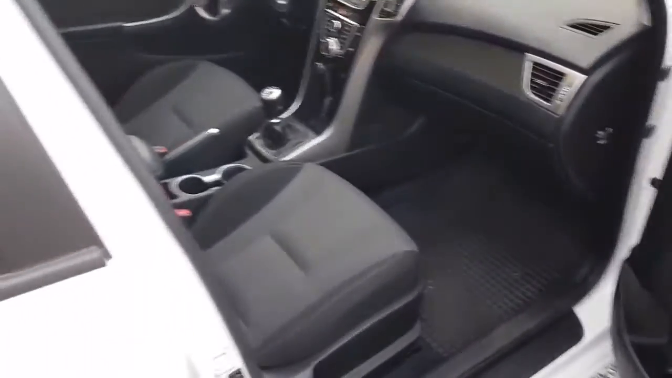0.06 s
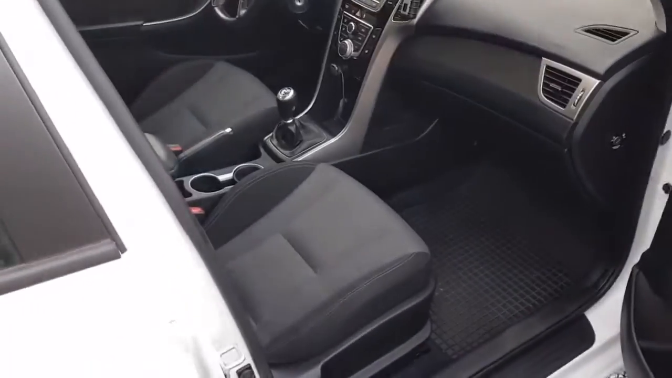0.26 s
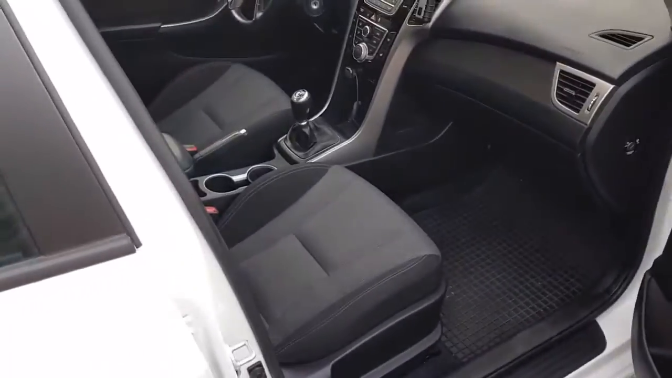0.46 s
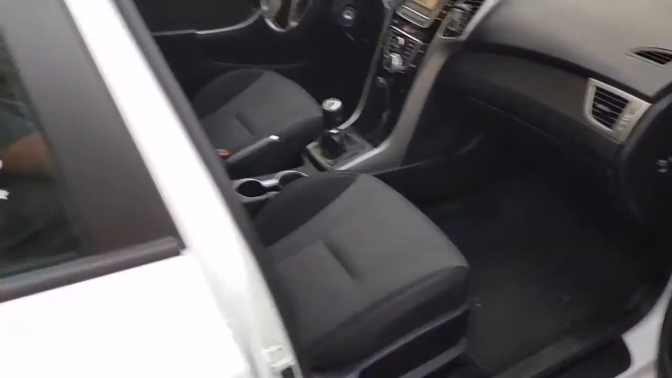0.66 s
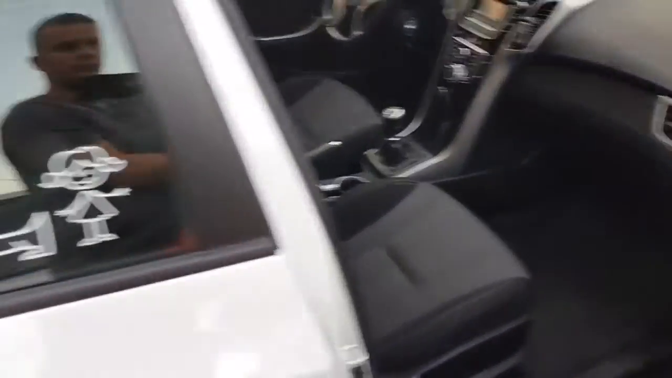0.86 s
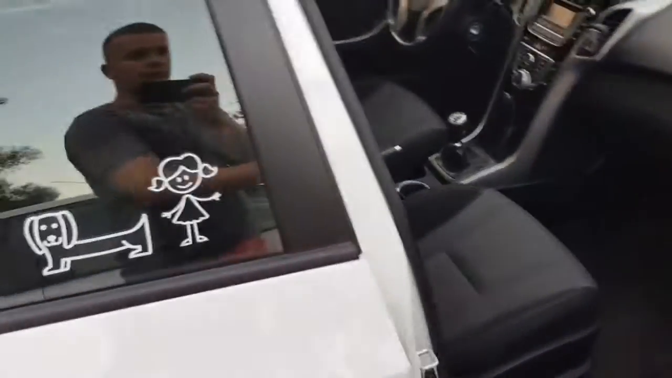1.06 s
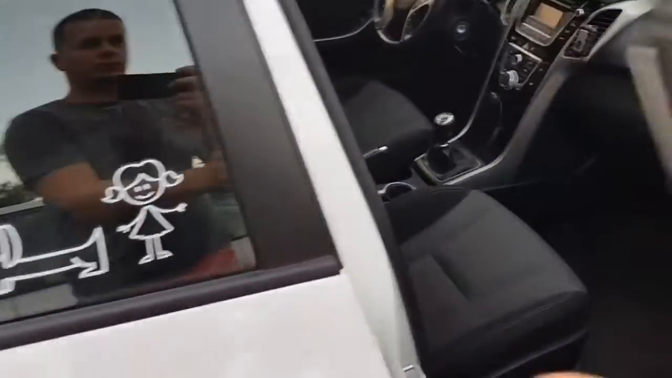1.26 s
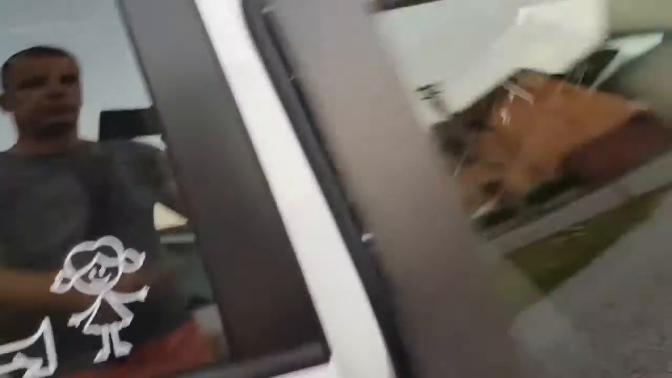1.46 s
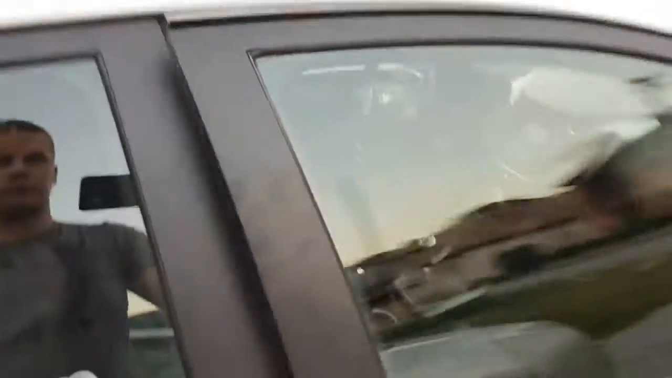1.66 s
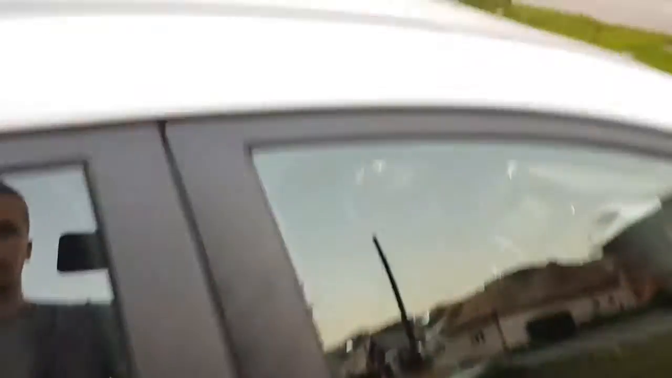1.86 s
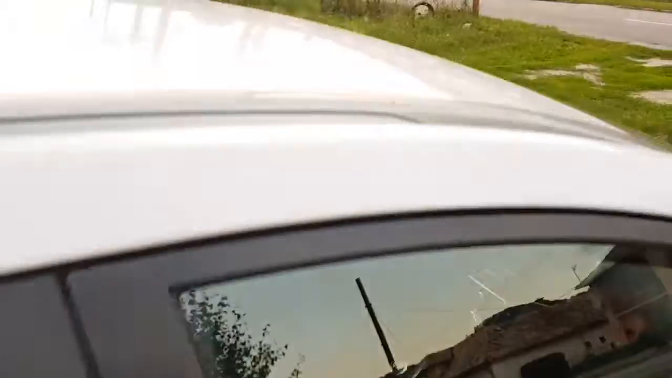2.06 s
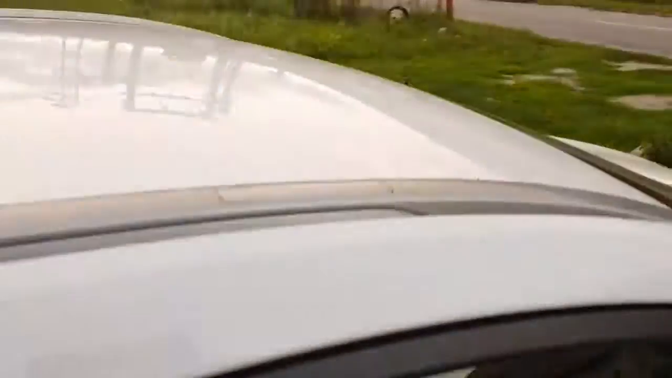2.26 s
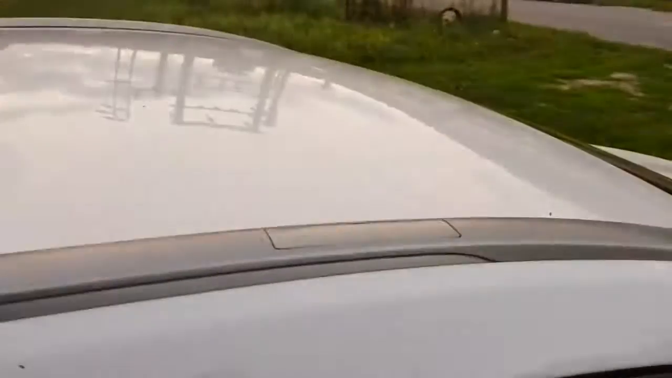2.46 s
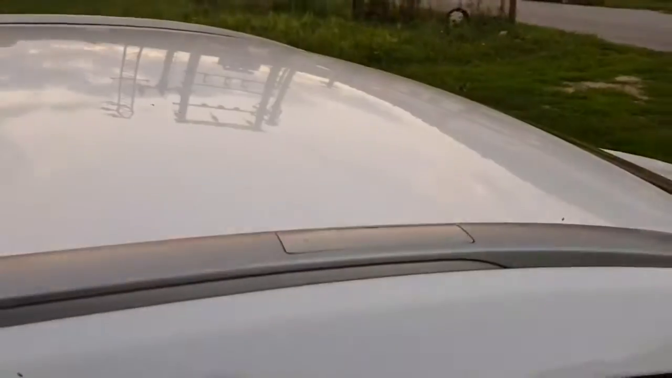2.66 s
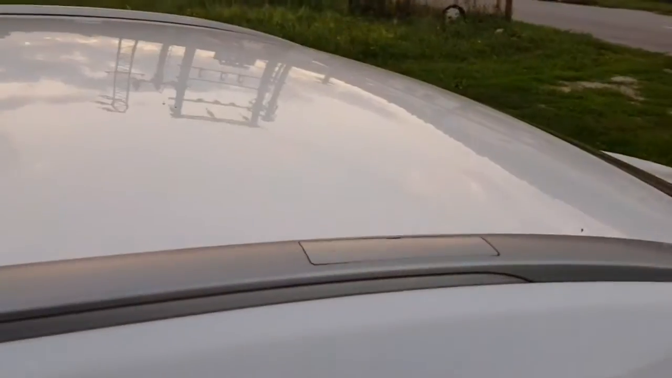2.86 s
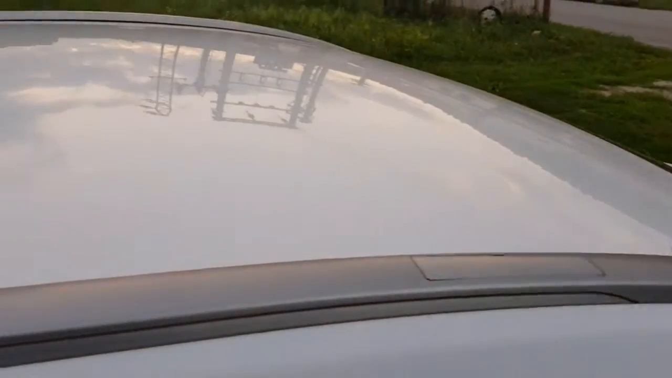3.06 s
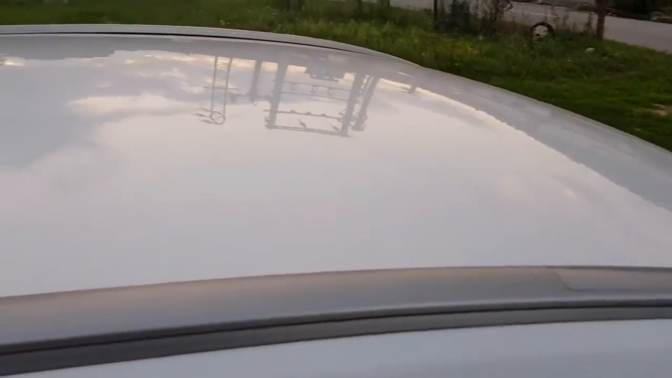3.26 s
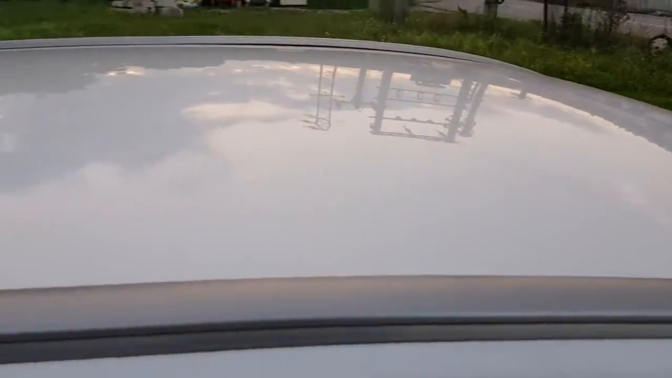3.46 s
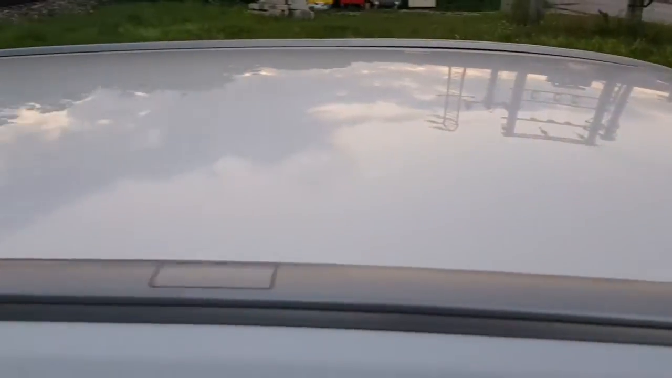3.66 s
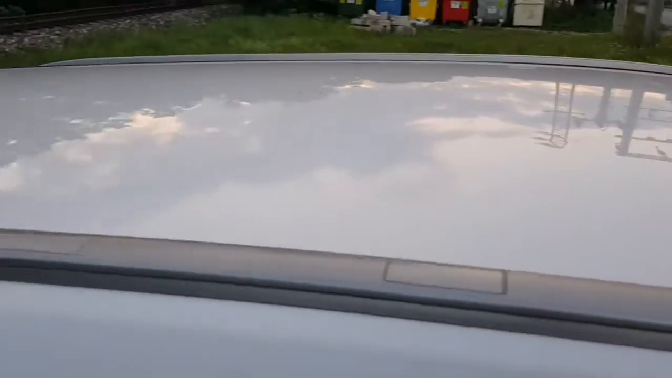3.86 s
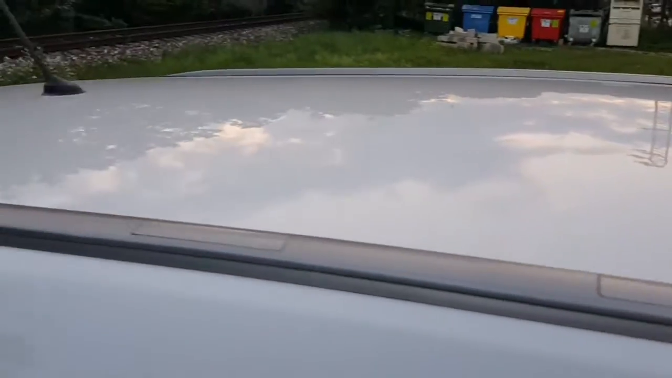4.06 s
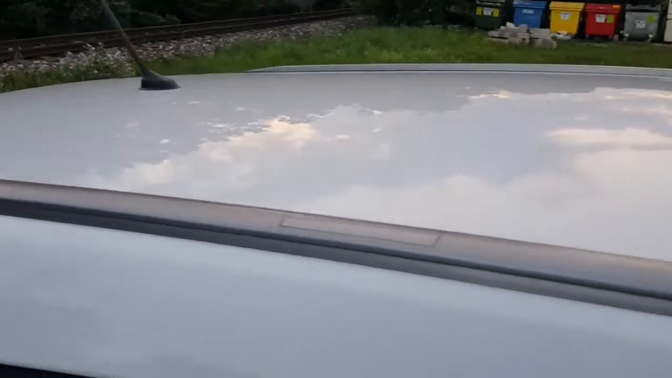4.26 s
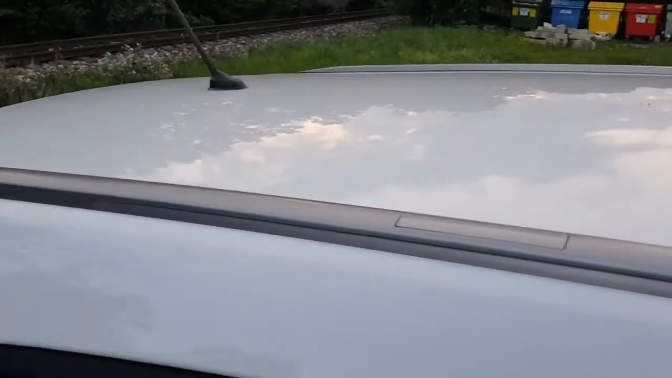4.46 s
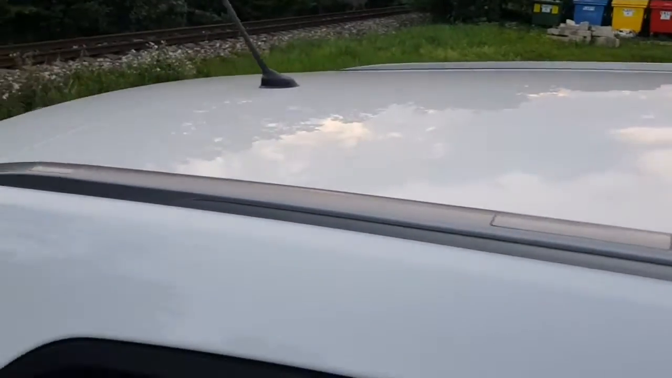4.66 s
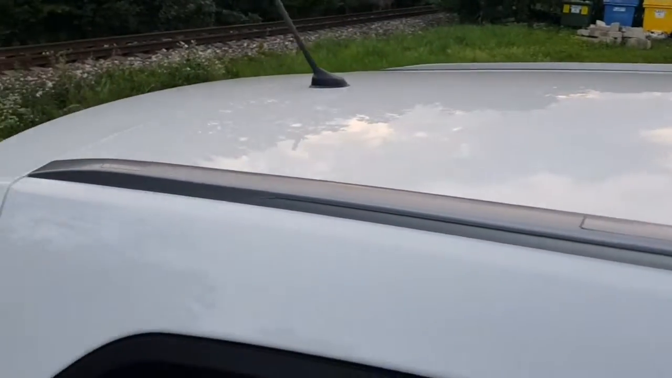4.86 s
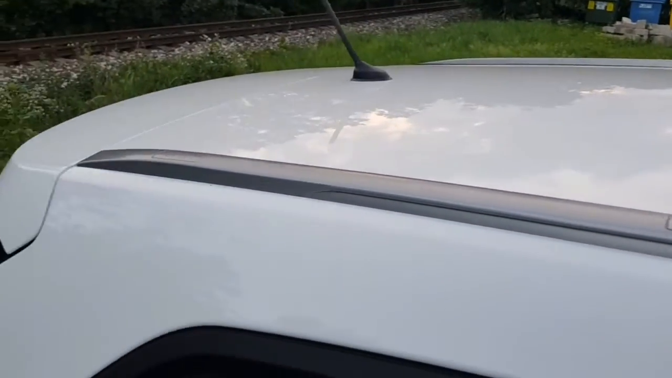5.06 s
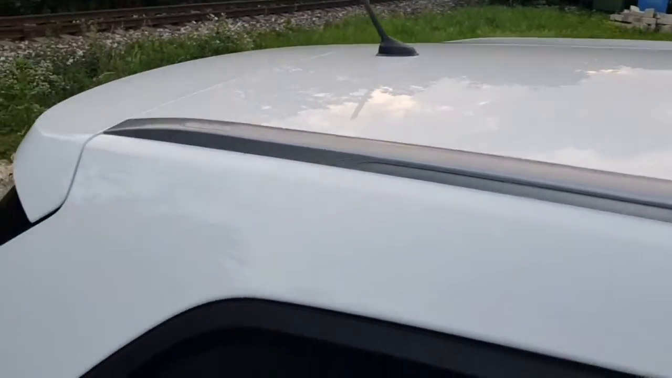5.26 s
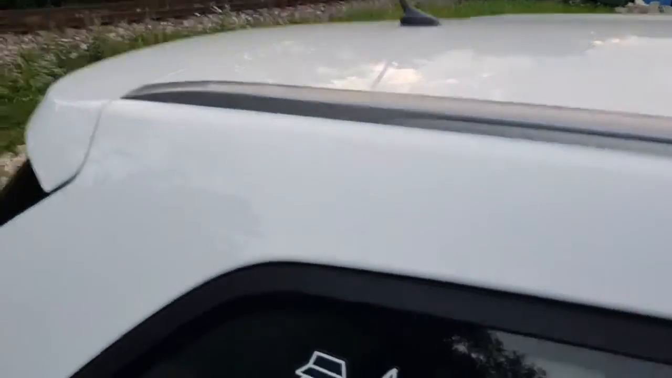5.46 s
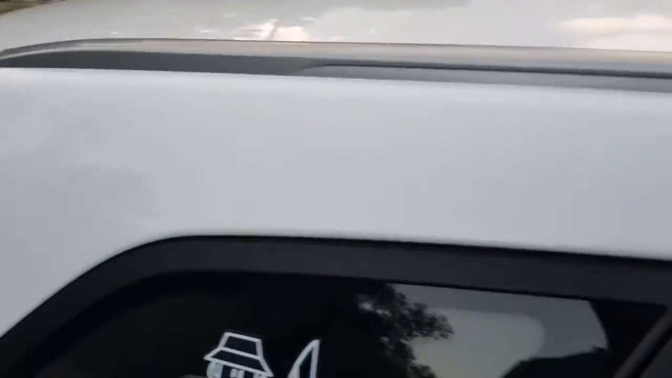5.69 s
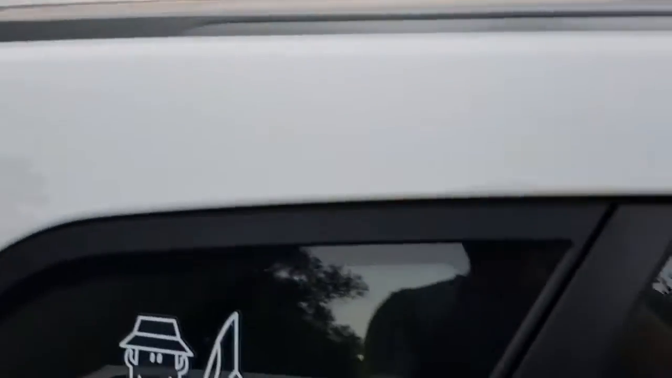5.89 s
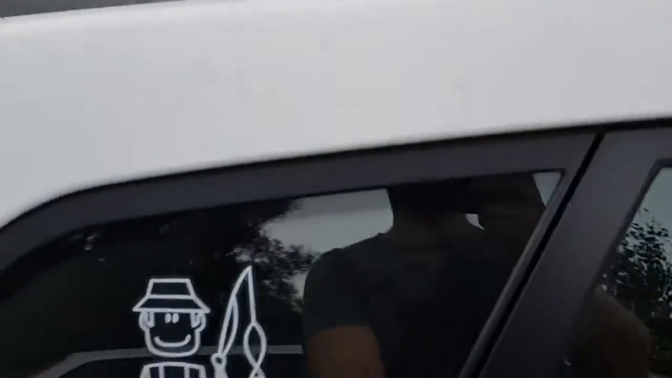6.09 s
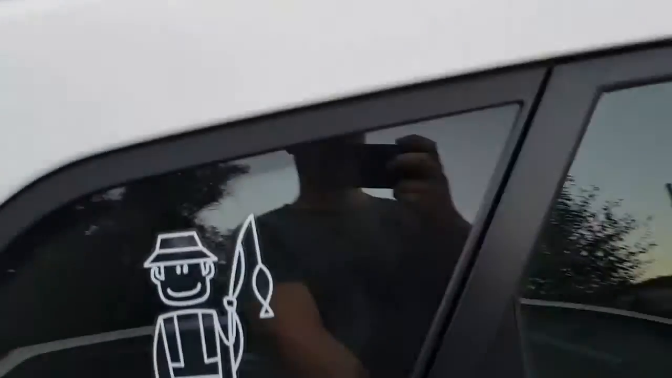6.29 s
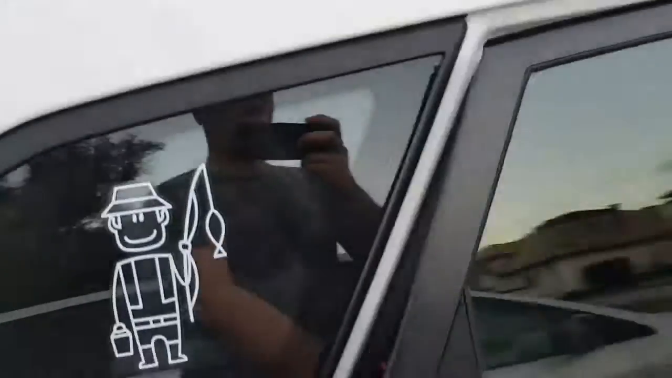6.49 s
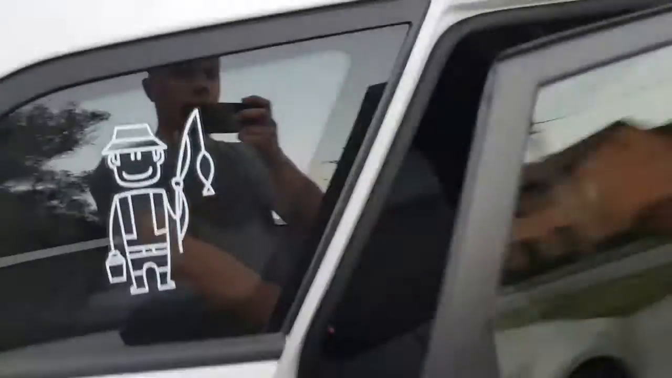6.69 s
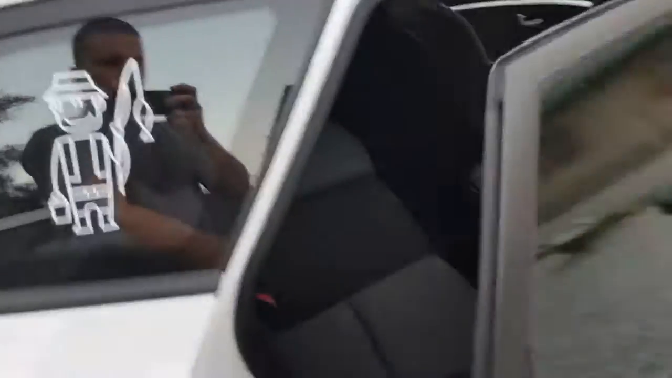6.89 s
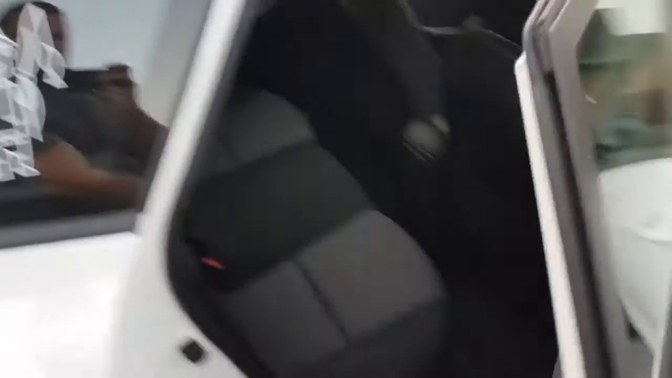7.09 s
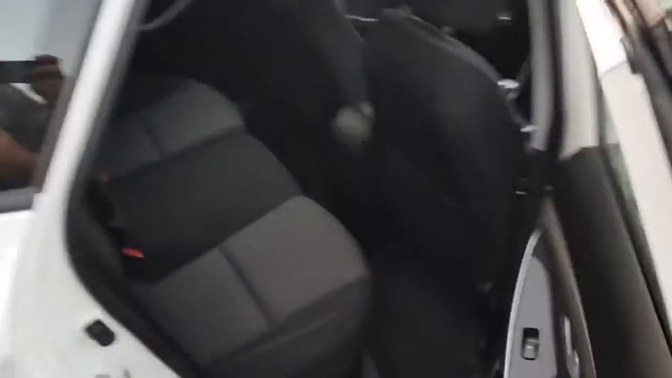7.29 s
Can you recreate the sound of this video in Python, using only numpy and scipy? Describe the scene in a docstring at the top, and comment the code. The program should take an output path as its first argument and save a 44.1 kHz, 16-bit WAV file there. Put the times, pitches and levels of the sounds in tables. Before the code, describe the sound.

Open air beside a parked car, heard through a hand-held stereo phone: steady faint traffic slightly to the left, thin hiss, light wind and a soft tyre hum that swells around 1.3 s and 5.7 s. A brief wind puff starts it; small bird pips and a weak whistle come before 0.6 s. Small clicks at 1.57 and 1.68 s, a short rush of air, then at 1.8 s a loud, close front-door slam: latch cracks, deep thump, quick rebounds and trim rattle. The background is ducked for about a second, with cloth rustle at 2 s and a scuff near 2.9 s. A click at 4.05 s, rising bird whistles at 4.45 and 5.7 s, rustling and scuffing around 5.4 s. Handle knocks and clicks from 6.05 s; at 6.36 s the rear door pops off its seal with a duller, softer thump, then slowing ticks and faint knocks around 7.2 s.

```python
"""Two car doors in the open air

Beside a parked car the front door is slammed, then the rear handle is pulled and that door pops off its seal.
Each blow sets off decaying modes of latch, door skin and cabin air, and noise grains from the shaken trim;
small parts tick as the door swings out. Shaped noise gives far traffic, a high hiss, light wind and rustling
clothes; gliding tones give a small bird's rising whistles and falling pips. All reach the two ports of a
hand-held phone, whose gain drops for about a second after the slam."""
import sys
import numpy as np
from scipy import signal
from scipy.fft import rfft, irfft
from scipy.io import wavfile
from scipy.ndimage import uniform_filter1d, minimum_filter1d

SR = 44100
rng = np.random.default_rng(int(sys.argv[2]) if len(sys.argv) > 2 else 0)


def put_to_file(sound):
    """Save the sound as 16-bit audio at rate SR, in the file named by the first command-line argument."""
    columns = np.atleast_2d(sound).T  # one column per channel
    safe = np.clip(columns, -1, 1)
    whole_steps = np.round(safe * 32767)
    wavfile.write(sys.argv[1], SR, whole_steps.astype(np.int16))


N = 323552
T = np.arange(N) / SR
SHUT_S = 1.788  # the front door meets its seal
ROAD_LAG_S = .0004  # the road's sound reaches the right port this much later


def undb(db):
    """Logarithmic level: decibels to amplitude gain."""
    return 10 ** (np.asarray(db) / 20)


def unit(x):
    """Normalisation: scale to rms 1."""
    return x / np.sqrt(np.mean(x ** 2))


def curve(table):
    """Linear interpolation: a timed table joined by straight lines."""
    s, value = np.transpose(table)
    return np.interp(T, s, value)


def pan(db):
    """Interchannel level difference: left and right gains, left minus right in dB."""
    return undb(np.array([[db], [-db]]) / 2)


def add(out, s, x):
    """Superposition: mix x into out from time s."""
    i = max(int(s * SR), 0)
    out[:, i:i + x.shape[-1]] += x[..., :N - i]


def swells(table):
    """Superposition of Gaussian envelopes, one per row, down to 1/e at the half length."""
    return sum(undb(db) * np.exp(-((T - s) / half_s) ** 2) for s, db, half_s in table)


def walk(rate):
    """Low-pass random process: smoothed steps, about rate per second, with a spread of 1."""
    k = int(SR / rate)
    steps = np.repeat(rng.standard_normal(N // k + 1), k)
    return unit(uniform_filter1d(uniform_filter1d(steps, k), k)[:N])


def colour(spectrum, f):
    """Spectral shaping: gain of a (f/Hz, level/dB) table, interpolated over log frequency."""
    hz, db = np.transpose(spectrum)
    return undb(np.interp(np.log(f + 1), np.log(hz), db))


def noise(spectrum, size, wide_hz=2000, peak_hz=1000, peak=0, lag_s=0):
    """Interaural coherence: coloured noise, alike at both ports in the bass and unlike in the treble."""
    f = np.fft.rfftfreq(size, 1 / SR)
    resonance = 1 + peak / (1 + ((f / peak_hz - 1) / 0.1) ** 2)
    mid, side = rfft(rng.standard_normal((2, size)))
    side = side * f / np.hypot(f, wide_hz)
    lag = np.exp(-2j * np.pi * f * lag_s)
    ports = np.array([mid + side, (mid - side) * lag])
    return unit(irfft(colour(spectrum, f) * resonance * ports, size))


def burst(rise_s, t60):
    """Free decay: half a second of envelope, a smooth rise and then 60 dB of fall per t60 (s)."""
    t = T[:SR // 2]
    return (1 - np.exp(-(t / rise_s) ** 2)) * undb(-60 * np.maximum(t - rise_s, 0) / t60)


def ring(modes, contact_s, scatter=0, spread=0.088):
    """Modal synthesis: one push sets off decaying sines; a softer contact starts them more gently."""
    out = 0
    for (hz, db, t60), (detune, offset) in zip(modes, rng.standard_normal((len(modes), 2))):
        phase = 2 * np.pi * hz * (1 + scatter * detune) * T[:SR // 2]
        # a wide panel reaches the two ports slightly out of step
        skew = spread * np.sqrt(hz / 200) * offset * np.array([[1], [-1]])
        out = out + undb(db) * np.sin(phase + skew) * burst(contact_s, t60)
    return out


# spectrum of the far traffic (f/Hz, level/dB per Hz)
TRAFFIC_SPECTRUM = [(25, -34), (55, -21), (100, -10.5), (155, -2.5), (210, -7), (350, 0), (430, -3),
                    (505, 0), (630, -5), (900, 0.5), (1400, -7), (2100, -16), (3000, -20.5), (8000, -31.5),
                    (16000, -37)]


def traffic(level_db=-47, flicker_db=.8):
    """Arrival-time difference: far traffic off to the left reaches the left port first."""
    level = undb(level_db + flicker_db * walk(8))
    return noise(TRAFFIC_SPECTRUM, N, wide_hz=1390, lag_s=ROAD_LAG_S) * level * pan(0.54)


# spectrum of the high hiss (f/Hz, level/dB per Hz)
HISS_SPECTRUM = [(1000, 8), (3000, -12), (5000, -3.5), (6400, -11.5), (7600, 1.5), (8300, -2.5),
                 (9100, 0.5), (10500, -9), (13000, -19.5), (16000, -36)]
# level of the high hiss (t/s, level/dB)
HISS_COURSE = [(0, -61), (1.1, -57.5), (2.6, -57), (3.6, -54), (5, -53.5), (6.5, -58), (7, -69),
               (7.34, -78)]


def hiss():
    """Broadband noise: a smooth high hiss with a slowly changing level."""
    return noise(HISS_SPECTRUM, N) * undb(curve(HISS_COURSE)) * pan(.8)


# spectrum of the far vehicle (f/Hz, level/dB per Hz)
PASSING_SPECTRUM = [(600, -15), (1400, -1.5), (2100, 0), (3000, -8.5), (6000, -48), (12000, -45)]


def passing(s=4.8, half_s=1.53, db=-56.5):
    """Gaussian envelope: the road noise brightens for a moment as a far vehicle goes by."""
    return noise(PASSING_SPECTRUM, N) * undb(db) * np.exp(-((T - s) / half_s) ** 2)


# pitch of the narrow drifting band (t/s, f/Hz)
BAND_PITCH = [(0, 700), (.6, 798.5), (1.15, 1044), (1.8, 917.3), (4.5, 844.7), (7.34, 855.4)]
# the narrow band swells louder for a while (t/s, level/dB, half length/s)
BAND_SWELLS = [(1.35, -54.5, 0.59), (5.75, -52, 0.65)]


def drifting_band(steady_db=-57, width_hz=90):
    """Heterodyning: slow noise shifted to a drifting pitch is a narrow band that glides near 1 kHz and swells
    twice."""
    gain = undb(steady_db) + swells(BAND_SWELLS)
    low_pass = signal.butter(2, width_hz, fs=SR, output="sos")
    slow = signal.sosfilt(low_pass, rng.standard_normal((2, N)))
    carrier = np.exp(2j * np.pi * np.cumsum(curve(BAND_PITCH)) / SR)
    song = unit(np.real((slow[0] + 1j * slow[1]) * carrier)) * gain
    return np.array([song, np.roll(song, int(ROAD_LAG_S * SR))]) * pan(3.3)


# spectrum of wind on the ports (f/Hz, level/dB per Hz)
WIND_SPECTRUM = [(15, -12.5), (35, -3.5), (65, 4), (110, -3), (190, -14.5), (500, -48.5)]
# a thump of handling at the start, then gusts on the ports (t/s, level/dB, half length/s)
THUMP_AND_GUSTS = [(0, -31.5, 0.053), (.2, -56.5, 0.12), (.96, -51, 0.031), (3.87, -50.5, 0.11),
                   (4.2, -48, 0.054)]


def wind(breeze_db=-60.5, draught_db=-38, rise_s=0.029, fall_s=0.15, buffet_db=2):
    """Turbulent flow noise: low buffeting by breeze, gusts, a handling thump at the start and the draught of
    the slammed door."""
    draught = undb(draught_db) * np.exp(-np.maximum((SHUT_S - T) / rise_s, (T - SHUT_S) / fall_s))
    flow = undb(breeze_db) + swells(THUMP_AND_GUSTS) + draught
    return noise(WIND_SPECTRUM, N, wide_hz=251) * flow * undb(buffet_db * walk(25)) * pan(0.89)


# the bird's rising whistles, all over the same range (t/s, length/s, level/dB)
BIRD_WHISTLES = [(.48, .085, -66), (4.452, .105, -56), (5.706, .112, -51.5)]
# its short, slightly falling pips (t/s, f/Hz, level/dB)
BIRD_PIPS = [(.13, 5300, -58.5), (.455, 2980, -56), (5.125, 5030, -59)]
WHISTLE_FROM_HZ, WHISTLE_TO_HZ = 2850, 4670
PIP_S, PIP_FALL = 0.033, 0.049  # length, and fall as a fraction of the pitch
NOTE_GROWTH_DB = 4.5  # a note grows louder towards its end


def bird(echo_db=-7, echo_t60=0.34):
    """Frequency modulation and scattering: wavering glides that level off, echoed by trees and houses."""
    out = np.zeros((2, N))
    unsteady, flutter_db = 1 + .007 * walk(220), 2.5 * walk(150)
    notes = [(s, length_s, WHISTLE_FROM_HZ, WHISTLE_TO_HZ, db) for s, length_s, db in BIRD_WHISTLES]
    notes += [(s, PIP_S, hz, hz * (1 - PIP_FALL), db) for s, hz, db in BIRD_PIPS]
    for s, length_s, start_hz, end_hz, db in notes:
        u = np.linspace(0, 1, int(length_s * SR))
        own = slice(int(s * SR), int(s * SR) + len(u))
        glide = np.sin(np.pi / 2 * u ** 1.3)
        hz = (start_hz + (end_hz - start_hz) * glide) * unsteady[own]
        level = undb(db + NOTE_GROWTH_DB * (u - .5) + flutter_db[own])
        gain = np.sqrt(np.abs(np.sin(np.pi * u))) * level
        add(out, s, gain * np.sin(2 * np.pi * np.cumsum(hz) / SR))
    echo = rng.standard_normal((2, SR // 2)) * burst(0.0036, echo_t60)
    echo = echo / np.linalg.norm(echo[0])
    return out + undb(echo_db) * signal.fftconvolve(out, echo, axes=1)[:, :N]


# spectrum of rubbing cloth (f/Hz, level/dB per Hz)
CLOTH_SPECTRUM = [(300, -2), (2000, 5), (5500, 2), (9000, 3), (12500, 5.5), (16000, 0.5)]
# brushing of clothes and hand (t/s, level/dB, half length/s)
CLOTH_SWELLS = [(.143, -58, .05), (.9, -66.5, 0.85), (.99, -59.5, 0.058), (1.987, -49, 0.1),
                (2.7, -65.5, 0.37), (5.036, -55.5, .1), (5.445, -48, 0.036), (5.7, -63, 0.14),
                (6.45, -53.5, 0.14), (7.288, -59, 0.074)]
# spectrum of a scuff (f/Hz, level/dB per Hz)
SCUFF_SPECTRUM = [(100, -18), (220, -2.5), (380, 3), (550, -4), (900, -6), (2000, -18), (4500, -20.5),
                  (12000, -53)]
# dull scuffs of feet and sleeves (t/s, level/dB, half length/s)
SCUFF_SWELLS = [(.13, -52, .08), (2.91, -45.5, .02), (5.44, -46, 0.047), (5.63, -48.5, 0.11),
                (6.58, -52, 0.22), (7.26, -46, 0.049)]


def clothes(flutter_db=3.5):
    """Friction noise: bright swells of cloth and dull scuffs of feet and sleeves, with a fine flutter."""
    flutter = undb(flutter_db * walk(160))
    rustles = noise(CLOTH_SPECTRUM, N) * swells(CLOTH_SWELLS) * pan(-.5)
    scuffs = noise(SCUFF_SPECTRUM, N) * swells(SCUFF_SWELLS) * pan(1)
    return flutter * (rustles + scuffs)


# modes of the trim (f/Hz, level/dB, t60/s)
TRIM_MODES = [(226, -8, 0.083), (271, -5.5, 0.12), (327, -2.5, 0.1), (425, -9, 0.089), (580, -13.5, 0.09),
              (860, -33, .04)]


def knock():
    """Modal excitation: a dull blow on the trim, never quite the same twice."""
    return ring(TRIM_MODES, 0.0024, scatter=0.065)


# spectrum of a click's snap (f/Hz, level/dB per Hz)
CLICK_SPECTRUM = [(150, 17.5), (500, 14.5), (1100, 12.5), (2500, 0), (6000, -4), (11000, -1.5),
                  (16000, -20)]


def click(hz, t60, pan_db, tone_db=-4, tone_t60=0.013, knock_db=-11.5):
    """Impact transient: a bright snap, the small part's short ring, and a weaker knock of the trim."""
    snap = noise(CLICK_SPECTRUM, SR // 2, peak_hz=hz, peak=2.6) * burst(0.00022, t60)
    tone = ring([(hz, tone_db, tone_t60)], 0.00025)
    return (snap + tone) * pan(pan_db) + undb(knock_db) * knock()


# soft knocks of handle and trim (t/s, level/dB)
TRIM_KNOCKS = [(2.201, -35), (2.906, -37.5), (5.724, -36), (6.158, -24), (6.224, -30.5), (6.24, -30.5),
               (6.334, -32), (6.437, -31.5), (6.676, -34.5), (7.172, -25.5), (7.19, -33.5), (7.241, -28.5)]
# small hard clicks of catches, levers and hinge (t/s, level/dB, ring f/Hz, snap t60/s, left minus right/dB)
PART_CLICKS = [(1.5724, -30.5, 1640, 0.0086, 2), (1.6755, -40, 1420, .012, 3), (2.876, -37, 910, .035, 1),
               (2.9094, -33.5, 4900, 0.05, 3), (4.0515, -30, 2120, 0.023, 2), (5.464, -31.5, 820, 0.025, 6),
               (6.048, -37.5, 4230, 0.021, -3), (6.129, -35, 1140, 0.22, 1), (6.149, -34, 6760, .035, 0),
               (6.156, -33, 4270, 0.055, 0), (6.2243, -35.5, 901, 0.1, -3), (6.486, -31, 4300, 0.025, -7),
               (6.5221, -30, 4510, 0.01, -8), (6.8044, -44, 2160, .04, -1)]


def small_parts():
    """Impact sound: dull knocks in the trim and bright clicks of catches and levers."""
    out = np.zeros((2, N))
    for s, db in TRIM_KNOCKS:
        add(out, s, undb(db) * knock())
    for s, db, hz, t60, pan_db in PART_CLICKS:
        add(out, s, undb(db) * click(hz, t60, pan_db))
    return out


TICKS_FROM_S, TICK_GAP_S, TICK_SLOWING = 6.577, .041, 1.23  # first gap, and growth per gap
TICK_DB, TICK_FADE_DB, TICK_HZ, TICK_T60_S, TICK_PAN_DB = -37.5, -2.5, 8550, .02, -5


def door_ticks(count=3):
    """Geometric series: as the rear door swings out, its ticks come ever slower and fainter."""
    out, s = np.zeros((2, N)), TICKS_FROM_S
    for k in range(count):
        add(out, s, undb(TICK_DB + k * TICK_FADE_DB) * click(TICK_HZ, TICK_T60_S, TICK_PAN_DB))
        s += TICK_GAP_S * TICK_SLOWING ** k
    return out


# spectrum of chattering trim, glass and lock rods (f/Hz, level/dB per Hz)
RATTLE_SPECTRUM = [(100, 18), (300, 10.5), (650, -14), (1200, -4), (1800, -8), (2700, -9.5), (4500, -16.5),
                   (5600, -21.5), (6800, -31.5), (9500, -27.5), (15000, -39)]


def rattle(rise_s, t60, grain_db=2.5):
    """Granular noise: trim, glass and lock rods chatter in uneven grains, nearer the right port."""
    size = SR // 2
    steps = np.repeat(undb(grain_db * rng.standard_normal(size)), 32)[:size]
    grains = uniform_filter1d(steps, size=16)
    return noise(RATTLE_SPECTRUM, size) * unit(grains) * burst(rise_s, t60) * pan(-2.0)


# modes of the latch (f/Hz, level/dB, t60/s)
LATCH_MODES = [(343.4, -3, 0.064), (503, 2, 0.024), (656, -1, 0.035), (845, -14.5, 0.063),
               (960, -28, 0.012), (1225, -12.5, 0.051), (1468, -16.5, 0.025), (2660, -27, 0.034),
               (2760, -21.5, 0.012)]


def latch(contact_s):
    """Modal excitation: a hard, brief contact rings the latch."""
    return ring(LATCH_MODES, contact_s)


# spectrum of the low rumble in the car's shell (f/Hz, level/dB per Hz)
RUMBLE_SPECTRUM = [(20, -44), (55, 1.5), (150, -5.5), (300, -15.5), (700, -23), (2000, -39), (8000, -53)]


def door(blows, modes, contact_s, rumble_db, rumble_t60, rattle_rise_s, rattle_t60, shiver_db, shiver_t60):
    """Coupled vibration: each blow rings door and latch, shakes the trim and makes the shell rumble."""
    out = np.zeros((2, N))
    for s, body_db, latch_db, rattle_db in blows:
        rumble = noise(RUMBLE_SPECTRUM, SR // 2, wide_hz=900) * burst(0.011, rumble_t60)
        shiver = rattle(0.019, shiver_t60)
        shell = undb(rumble_db) * rumble + undb(shiver_db) * shiver
        add(out, s, undb(body_db) * (ring(modes, contact_s) + shell))
        add(out, s, undb(latch_db) * latch(0.00044))
        add(out, s, undb(rattle_db) * rattle(rattle_rise_s, rattle_t60))
    return out


# the rear latch lets go and the seal springs back (t/s, body level/dB, latch level/dB, rattle level/dB)
RELEASE_BLOWS = [(6.3618, -11, -37, -16.5), (6.3715, -22, -27, -14.5), (6.3805, -18.5, -43, -36),
                 (6.3955, -41, -25, -19.5), (6.4075, -20.5, -52, -48)]
# modes of the rear door (f/Hz, level/dB, t60/s); the short-lived ones are trapped air and door skin
REAR_DOOR_MODES = [(61, -10, 0.072), (122, -12, 0.18), (165.6, 1.5, 0.11), (197, 0.5, 0.046),
                   (257.7, -9.5, 0.21), (360, -26, 0.072)]


def rear_door():
    """Release of stored strain: the latch lets go and the seal pushes the rear door off."""
    return door(RELEASE_BLOWS, REAR_DOOR_MODES, contact_s=0.0031, rumble_db=-24, rumble_t60=0.94,
                rattle_rise_s=0.0032, rattle_t60=0.064, shiver_db=-21, shiver_t60=0.48)


# spectrum of the rushing air (f/Hz, level/dB per Hz)
RUSH_SPECTRUM = [(50, -7), (160, 8), (400, -1.5), (1000, -4), (2500, -16), (5000, -26), (7000, -32),
                 (15000, -35)]


def swing(db=-35, grow_s=0.047):
    """Air displacement: the closing door pushes a growing rush ahead of it, which then dies away."""
    return undb(db) * noise(RUSH_SPECTRUM, N) * np.exp(-np.abs(T - SHUT_S) / grow_s)


# the latch snaps over the striker's two catches (t/s, crack level/dB, latch level/dB)
STRIKER_CATCHES = [(1.7858, -6, -17), (1.7905, -4, -20)]


def striker(t60=0.012):
    """Impact of hard bodies: the latch meets the striker with two short cracks."""
    out = np.zeros((2, N))
    for s, crack_db, latch_db in STRIKER_CATCHES:
        add(out, s, undb(crack_db) * rattle(0.00025, t60) + undb(latch_db) * latch(0.00036))
    return out


# the seal touches, the latch catches, the door lands and rebounds
# (t/s, body level/dB, latch level/dB, rattle level/dB), all before the slam's common gain
SLAM_BLOWS = [(1.776, -62, -28.5, -21.5), (1.7897, -16, -5.5, -12.5), (1.803, -40, -15.5, -11.5),
              (1.8165, -6.5, -27, -6), (1.8255, -3.5, -26, -20), (1.8455, -11.5, -19.5, -46),
              (1.8595, -4.5, -20, -21), (1.8805, -16, -40, -50)]
# modes of the front door (f/Hz, level/dB, t60/s)
# the short-lived ones are the thump of air trapped by the seal and the slap of the door skin
FRONT_DOOR_MODES = [(53, -7.5, 0.16), (96, -20.5, 0.24), (128.6, 2.5, 0.036), (152.1, -19.5, 0.26),
                    (183, -15, 0.15), (248, -11, 0.12), (298, -3.5, 0.037), (362.4, -12, 0.058),
                    (392, -16, 0.058)]


def front_door(slam_gain_db=5.5):
    """Repeated impact: the slammed door strikes and rebounds, loud enough to push the phone's gain down."""
    blows = door(SLAM_BLOWS, FRONT_DOOR_MODES, contact_s=0.0015, rumble_db=-27.5, rumble_t60=0.5,
                 rattle_rise_s=0.0036, rattle_t60=0.061, shiver_db=-35, shiver_t60=0.25)
    return undb(slam_gain_db) * (blows + striker())


def scene():
    """Linear superposition: the open air, the small parts and both doors."""
    surroundings = traffic() + hiss() + passing() + drifting_band() + wind() + bird()
    car = small_parts() + door_ticks() + rear_door() + swing() + front_door()
    return surroundings + clothes() + car


def gain_control(x, limit_db=-9.5, hold_s=1.055, recover_db_per_s=21):
    """Dynamic range control: sound over the limit lowers the gain, which holds and then recovers."""
    power = uniform_filter1d(np.mean(x ** 2, axis=0), size=SR // 50)
    over_db = np.maximum(10 * np.log10(np.abs(power) + 1e-12) - limit_db, 0)
    half = int(hold_s * SR / 2)
    # the largest excess within the past hold time
    held_db = -minimum_filter1d(-over_db, 2 * half + 1, origin=half, mode="constant")
    recovery_db = recover_db_per_s * T
    cut_db = np.maximum.accumulate(held_db + recovery_db) - recovery_db
    return x * undb(-cut_db)


# the right port's colour against the left (f/Hz, level/dB)
PORT_DIFFERENCE = [(50, -1.5), (200, -0.5), (500, -1.5), (1100, -2), (2000, 0), (3500, 3.5), (5800, 4),
                   (7600, -4), (9500, 2.5), (12000, 1.5), (15000, 4.5)]


def record(dry):
    """Transducer response: port colour, bass cut, gain control, soft saturation and a steep top cut."""
    tilt = np.sqrt(colour(PORT_DIFFERENCE, np.fft.rfftfreq(N, 1 / SR)))  # half to each port
    x = irfft(rfft(dry) * np.array([1 / tilt, tilt]), N)
    x = signal.sosfilt(signal.butter(2, 30, "high", fs=SR, output="sos"), x)
    x = gain_control(x)
    x = 1.3 * np.tanh(x / 1.3)  # rounds the highest peaks
    return signal.sosfilt(signal.ellip(10, .2, 70, 15700, fs=SR, output="sos"), x)


dry = scene()
out = record(dry)
put_to_file(out)
```